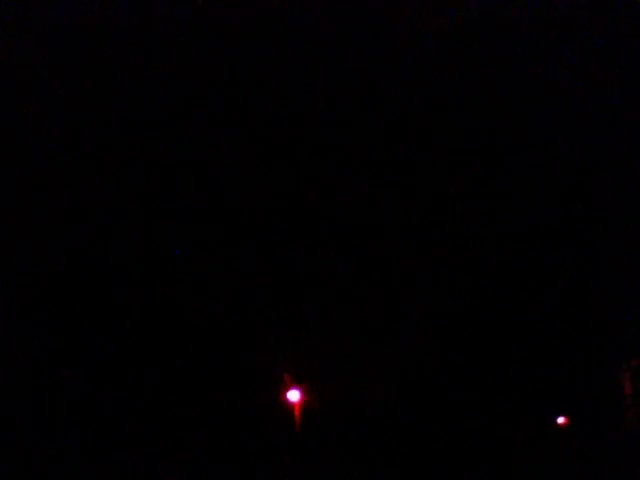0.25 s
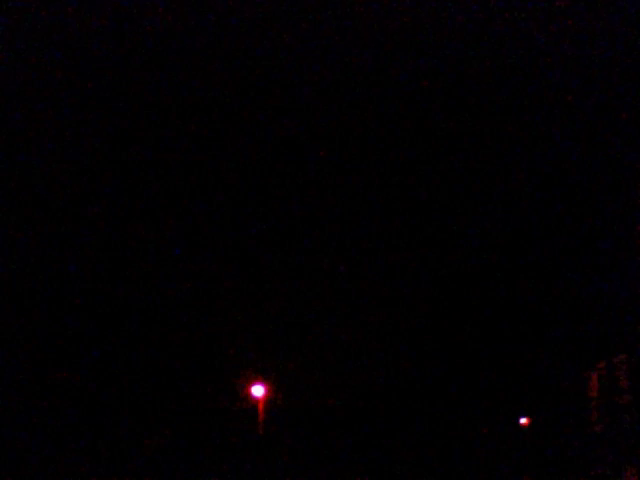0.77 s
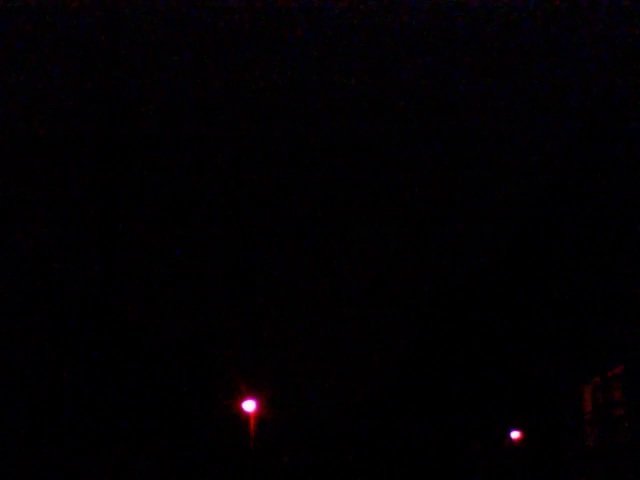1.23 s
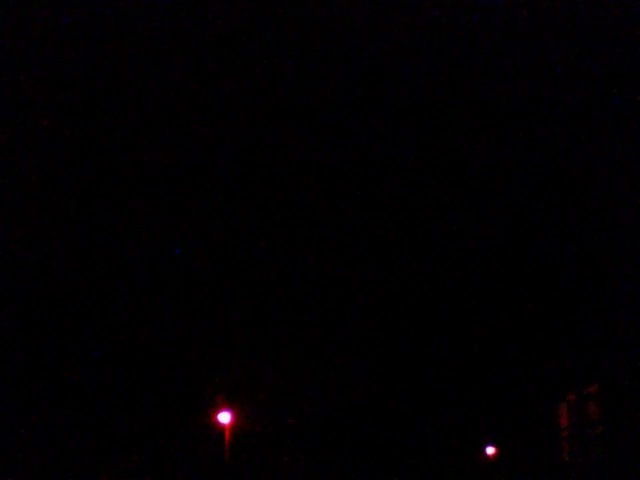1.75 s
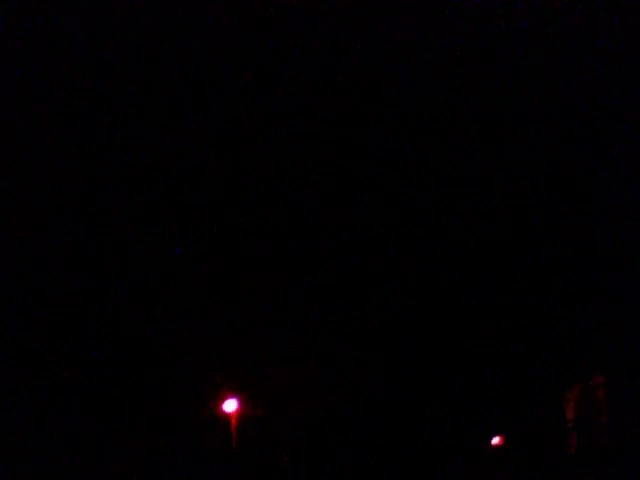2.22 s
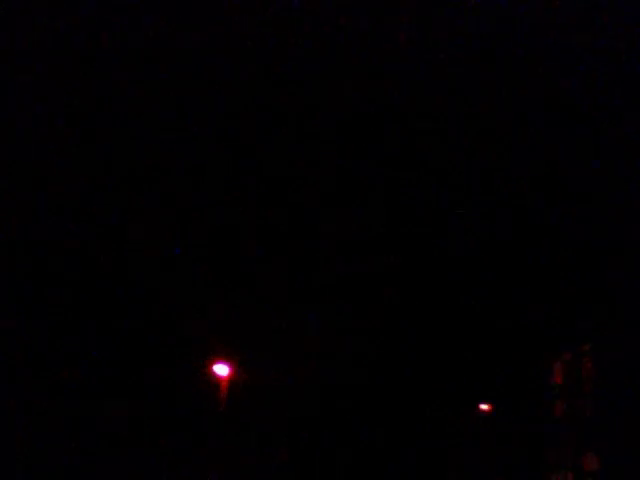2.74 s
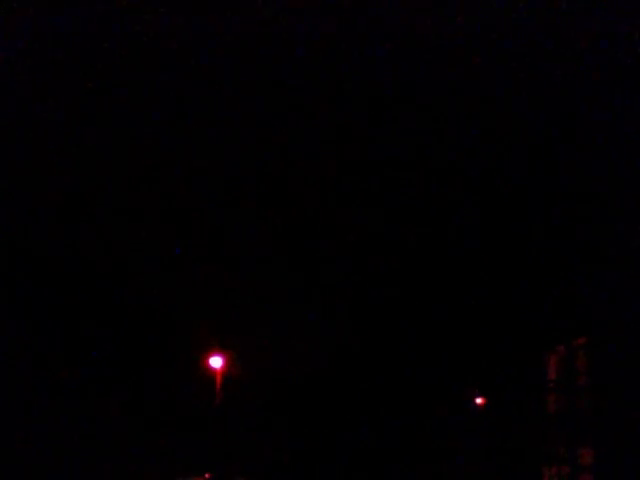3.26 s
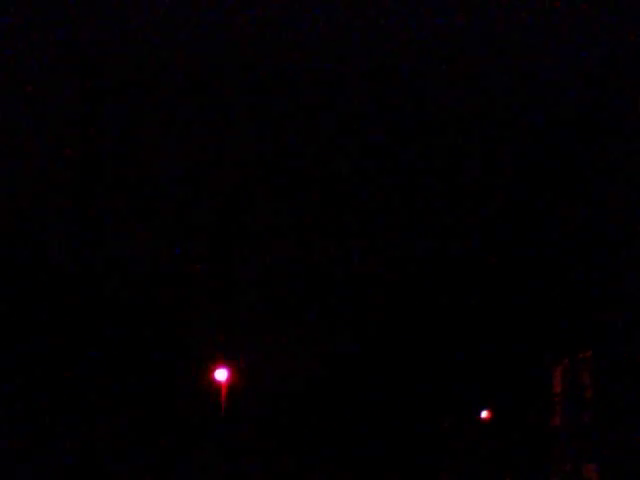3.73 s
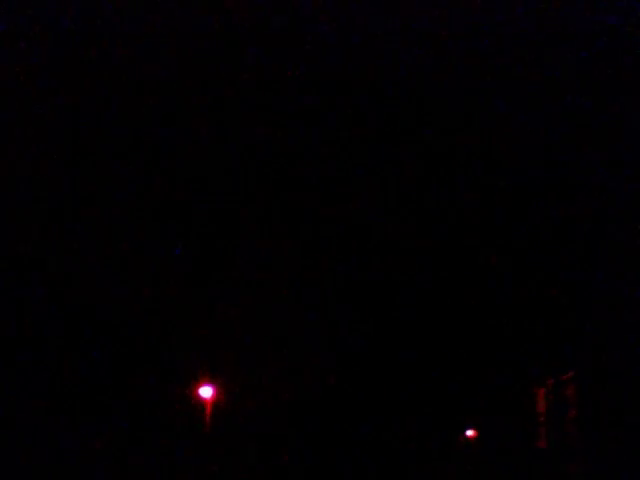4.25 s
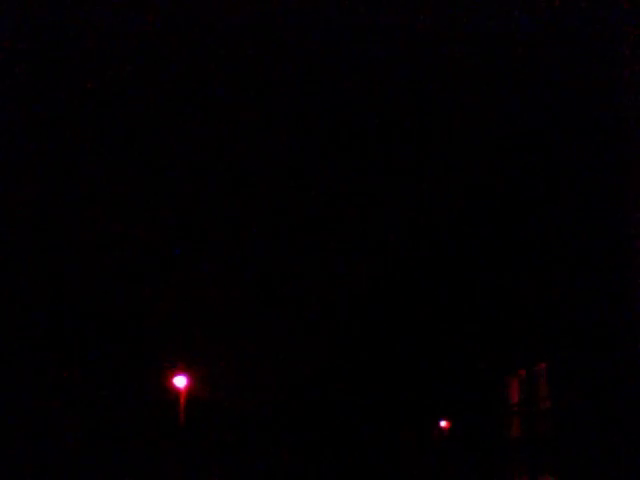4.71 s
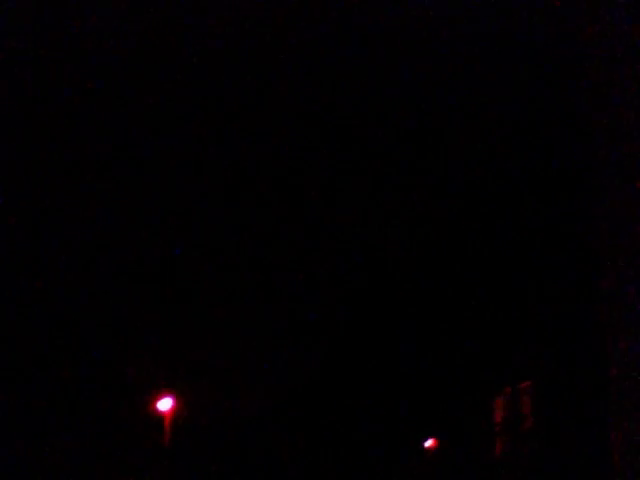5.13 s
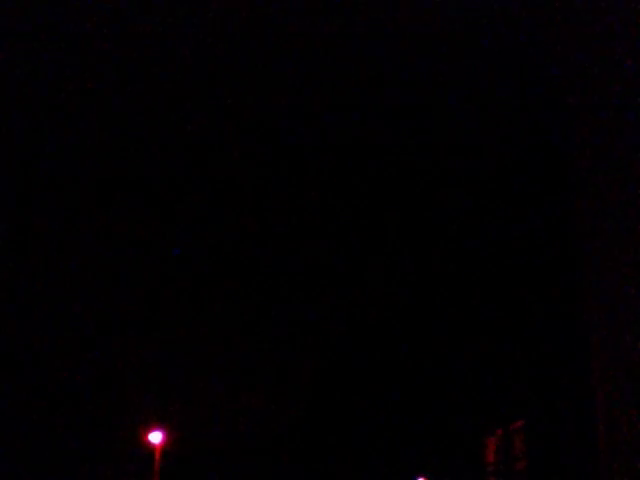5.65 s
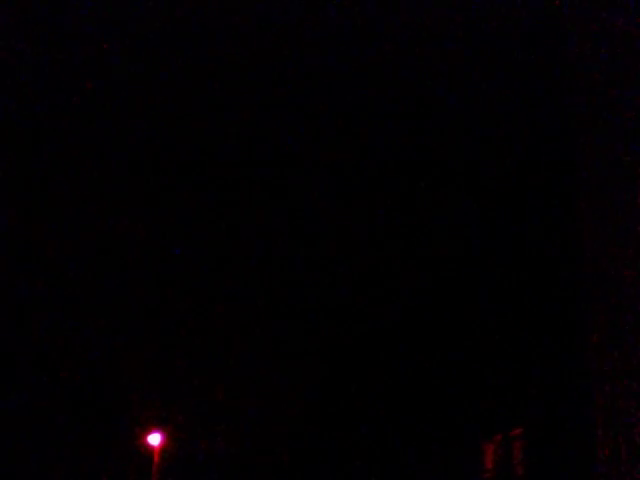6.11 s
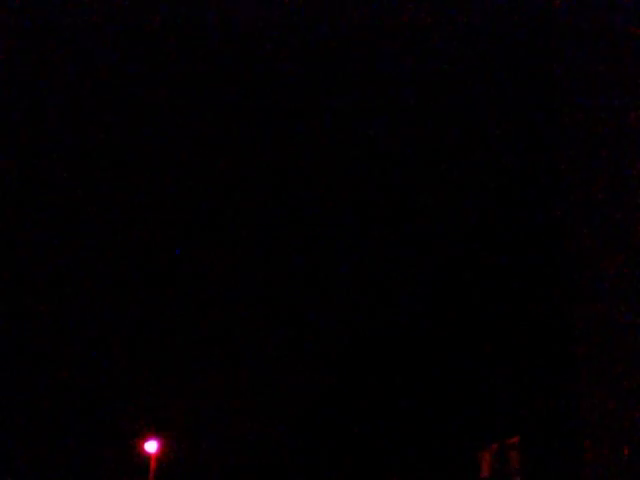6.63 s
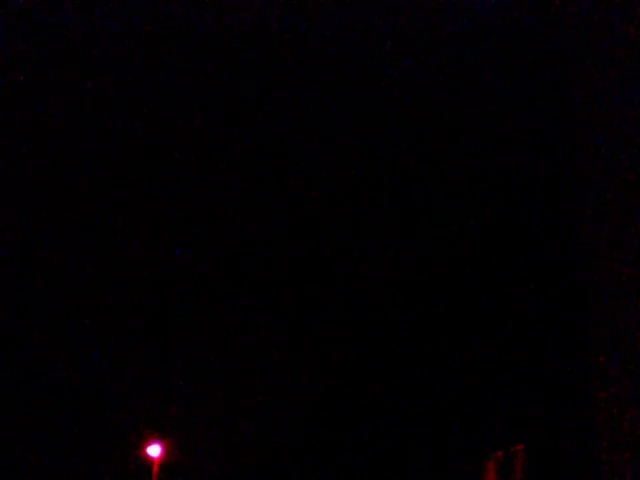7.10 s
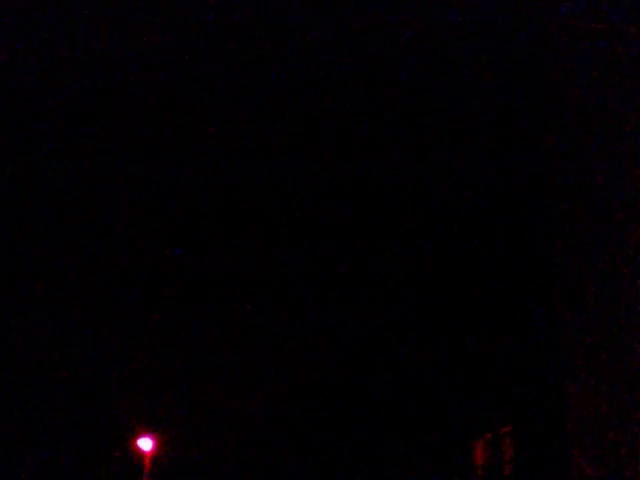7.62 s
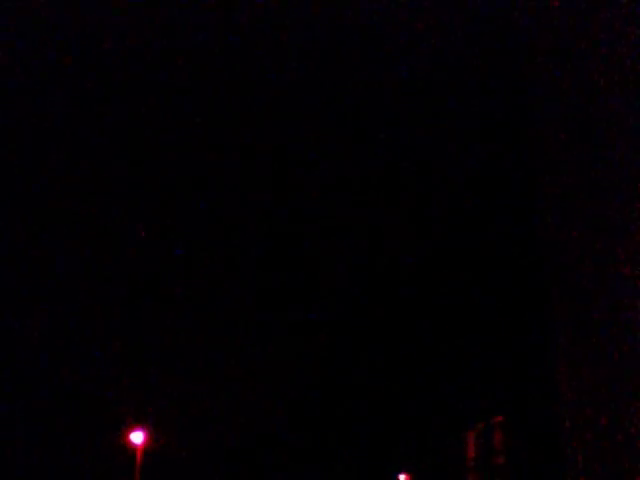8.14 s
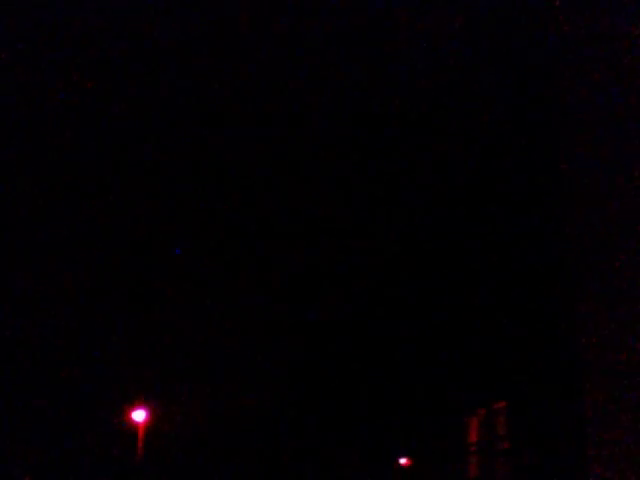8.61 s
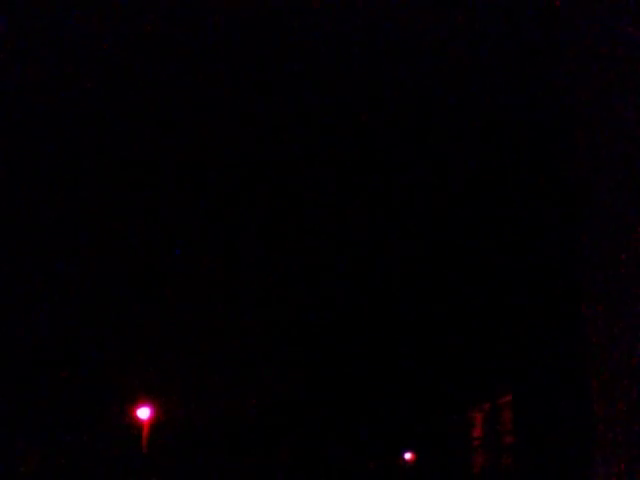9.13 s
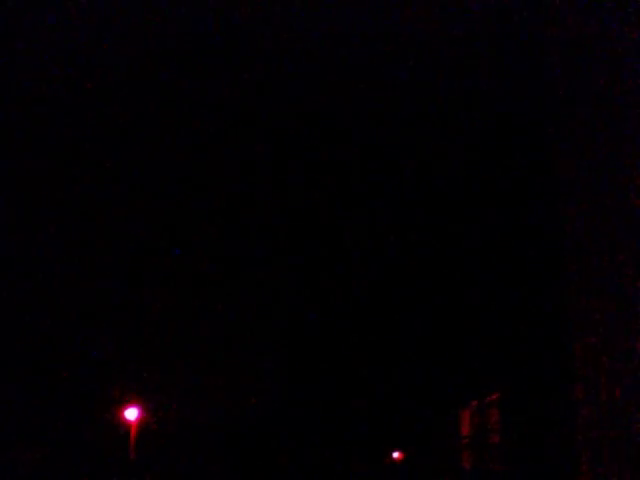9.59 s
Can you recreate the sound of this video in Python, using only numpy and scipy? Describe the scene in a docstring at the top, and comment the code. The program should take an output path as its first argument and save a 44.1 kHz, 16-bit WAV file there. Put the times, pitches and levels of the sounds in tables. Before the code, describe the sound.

Violent tearing thunder cracks above a rainy street, echoes between house fronts, surges again as a deep shudder, and fades into steady rain.

```python
"""A close thunderclap tears open over a street at night, rolls on in peals and sinks back into heavy rain.
The thunder is a swarm of random shock fronts, swelled by rolls and peals, with a pitched boom in each peal.
House fronts add echo and low resonances; sparse impulses make the tearing, shaped noise the deep shudder.
The rain is noise with a patter of impulses, and a few fat drops burst nearby into sprays of droplets.
A small narrow-band microphone overloads on the loudest peals."""
import sys
import numpy as np
from scipy import signal
from scipy.fft import rfft, irfft, next_fast_len
from scipy.io import wavfile
from scipy.ndimage import map_coordinates

SR = 44100
rng = np.random.default_rng(int(sys.argv[2]) if len(sys.argv) > 2 else 0)


def master(y):
    """Save y as 16-bit WAV."""
    cut = np.clip(np.atleast_2d(y).T, -1, 1)
    pcm = np.round(cut * 32767)  # scale
    wavfile.write(sys.argv[1], SR, pcm.astype(np.int16))


N = 434826
ATTACK_S = 0.016  # linear rise in amplitude of each roll and of the shudder


def amp(db):
    """Amplitude ratio: 20 dB is a factor of ten."""
    return 10 ** (np.asarray(db) / 20)


def unit(x):
    """Normalization: x scaled to rms 1."""
    return x / np.sqrt(np.mean(x ** 2) + 1e-20)


def gain(points, hz):
    """Frequency response: gain of (Hz, dB) points joined on a log-frequency axis."""
    f, db = np.transpose(points)
    return amp(np.interp(np.log(hz + 1), np.log(f + 1), db))


def wobble(rate):
    """Slow random modulation: a smooth curve through random knots, rate of them a second."""
    knots = rng.standard_normal(int(N * rate / SR) + 4)
    return map_coordinates(knots, [np.arange(N) * rate / SR])


def filtered(x, response):
    """Linear filtering: the spectrum of x times a response of frequency."""
    m = next_fast_len(N + SR // 2)
    return irfft(rfft(x, m) * response(np.fft.rfftfreq(m, 1 / SR)), m)[:N]


def coloured(x, points, size=8192):
    """Minimum-phase filtering: a causal pulse of energy 1 with the given spectrum, convolved with x."""
    # folding the cepstrum onto positive times makes the pulse causal
    cepstrum = irfft(np.log(gain(points, np.fft.rfftfreq(size, 1 / SR))))
    cepstrum[1:size // 2] *= 2
    cepstrum[size // 2 + 1:] = 0
    pulse = irfft(np.exp(rfft(cepstrum)))
    return signal.fftconvolve(x, pulse / np.linalg.norm(pulse))[:N]


def impacts(rate, spread_db):
    """Shot noise: impulses at random moments, rate a second, with scattered sizes and signs, rms 1."""
    hit = rng.random(N) < rate / SR
    sizes = amp(spread_db * np.clip(rng.standard_normal(N), -2, 2))
    return unit(hit * sizes * rng.choice([-1, 1], N))


def street(x, t60, wet_db):
    """Diffuse reverberation: house fronts scatter a decaying echo; the mean power stays about the same."""
    t = np.arange(SR // 2) / SR
    tail = rng.standard_normal(len(t)) * amp(-60 * t / t60)
    echo = signal.fftconvolve(x, tail / np.linalg.norm(tail))[:N]
    return (x + amp(wet_db) * echo) / np.hypot(1, amp(wet_db))


def walls(x):
    """Resonance: the space between the house fronts reinforces a few low notes."""
    # Each row: resonant frequency in Hz, bandwidth in Hz, strength of the added resonance in dB.
    modes = [(140, 20, -8.5), (220, 39, -8), (366, 36, -6)]

    def response(f):
        resonances = 0
        for hz, width, db in modes:
            damping = 1j * f * width
            resonances = resonances + amp(db) * damping / (hz * hz - f * f + damping)
        return 1 + resonances

    return filtered(x, response)


def rain():
    """Superposition: countless far drops merge into a noise wash; nearer ones patter through it."""
    # Spectrum of the rain. Each row: frequency in Hz, relative spectral level in dB.
    rain_spectrum = [(20, 8.5), (90, 6.5), (150, -6), (400, -14.5), (850, 0), (1150, -3.5), (1400, -8),
                     (1850, -4.5), (2350, -15.5), (2800, -10), (3200, -15), (3700, -15), (4500, -18)]
    wash = rng.standard_normal(N) * amp(-36.0 + 0.92 * wobble(4.5))
    patter = impacts(rate=300, spread_db=5.0) * amp(-41.0)
    return coloured(wash + patter, rain_spectrum)


def splashes():
    """Impact and decay: a fat drop bursts into a short spray of droplets, dense random impulses."""
    # Fat drops landing close by. Each row: start in seconds, relative strength in dB.
    drops = [(1.052, -17), (1.5664, -24), (3.6374, -28.5), (3.81, -21), (4.2293, -28), (5.4115, -28),
             (5.8012, -22), (6.2973, -23.5), (8.339, -22.5), (8.525, -27.5), (8.7485, -27)]
    # Spectrum of the spray. Each row: frequency in Hz, relative spectral level in dB.
    splash_spectrum = [(800, -22), (2000, -15.5), (2900, 2), (3600, -3), (4500, -4.5)]
    decay_60_db_s, rise_s = 0.099, 0.0022
    age = np.arange(SR // 4) / SR
    burst = amp(-60 * age / decay_60_db_s) * (1 - np.exp(-age / rise_s))
    spray = np.zeros(N)
    for start, db in drops:
        spray[round(start * SR):][:len(age)] += amp(db - 3.5) * burst
    droplets = impacts(rate=2500, spread_db=2.5)
    return coloured(spray * droplets, splash_spectrum)


def shudder():
    """Decaying low-frequency noise: the long trunk of the lightning arrives and dies slowly."""
    # Spectrum of the shudder. Each row: frequency in Hz, relative spectral level in dB.
    shudder_spectrum = [(20, -17.5), (45, -5.5), (72, -1.5), (100, -8), (160, -30.5), (400, -71)]
    start_s, level_db, fall_db_per_s = 5.87, -20, 18
    age = np.maximum(np.arange(N) / SR - start_s, 0)
    level = np.minimum(age / ATTACK_S, 1) * amp(level_db - fall_db_per_s * age)
    return coloured(rng.standard_normal(N) * level, shudder_spectrum)


def tearing(roar_power):
    """Modulated shot noise: crackle rides on the roar; the nearest branches, heard first, keep the most."""
    # Spectrum of the crackle. Each row: frequency in Hz, relative spectral level in dB.
    crackle_spectrum = [(500, -39), (1200, -0.5), (1550, 1), (1850, 4), (2100, -1), (2400, -9), (3000, -13),
                        (4200, -33.5)]
    near_db, follow = -25, 0.32  # follow: dB of crackle per dB of roar
    near_end_s, near_fall_db_per_s = 1.72, 19.5
    far_db = -24  # the trace of crackle left in every later roar
    t = np.arange(N) / SR
    roar_db = 10 * np.log10(roar_power)
    near_level_db = near_db + follow * roar_db - near_fall_db_per_s * np.maximum(t - near_end_s, 0)
    far_level = amp(far_db) * np.sqrt(roar_power)
    level = np.hypot(amp(near_level_db), far_level)
    sparks = impacts(rate=360, spread_db=3) * level * amp(1.2 * wobble(35))
    return street(coloured(sparks, crackle_spectrum), t60=0.11, wet_db=-2)


def split(db, bright_db):
    """Partition of power: rumble and roar as a column, with the roar bright_db above the rumble."""
    ratio = amp(bright_db) ** 2
    return amp(db) ** 2 * np.array([[1], [ratio]]) / (1 + ratio)


def rolls():
    """Power envelopes of rumble and roar: each roll rises, holds, drops and leaves a long echo."""
    # Long rolls, one for each branch of the lightning.
    # Each row: start in seconds, hold in seconds, relative strength in dB, roar over rumble in dB.
    branches = [(0.0, 0.11, -26.5, 1), (0.185, 0.25, -11, 2), (0.325, 0.095, -5, 3), (0.5, 0.17, -15.5, 3),
                (0.693, 0.19, -19.5, 1.5), (0.966, 1, -20.5, 2), (2.203, 0.58, -30.5, 0.5),
                (2.487, 0.145, -22.5, -0.5), (2.868, 0.18, -26, 1), (3.559, 0.39, -24, 1),
                (3.984, 0.27, -16.5, 4.5), (4.059, 0.07, -19.5, 7), (4.397, 0.19, -24.5, 2),
                (4.611, 0.13, -20.5, 4.5), (4.984, 0.16, -28.5, 7.5), (5.603, 0.13, -29, -3),
                (5.816, 0.34, -15.5, -3), (5.993, 0.071, -11.5, -1.5), (6.223, 0.11, -17.5, -1.5),
                (6.468, 0.094, -18.5, 1), (6.638, 0.62, -20, -1.5), (6.769, 0.22, -15.5, -4),
                (6.859, 0.067, -15, -1.5), (7.295, 0.18, -16.5, -1.5), (7.552, 0.41, -20.5, -3),
                (7.999, 0.46, -31, -0.5), (8.706, 0.14, -25.5, 3.5), (8.995, 0.86, -27.5, -5.5),
                (9.536, 0.094, -24, -3)]
    fall_db_per_s = 125
    # the long echo, fuller after a long roll
    echo_db, echo_build_s, echo_fall_db_per_s = -16, 0.26, 8.5
    distant_db = -32  # far thunder that never stops
    churn_db, churn_per_s = 0.7, 22  # chance swells
    t = np.arange(N) / SR
    power = np.zeros((2, N))
    for start, hold, db, bright_db in branches:
        first = max(round(start * SR), 0)
        age = t[first:] - start
        past = np.maximum(age - hold, 0)
        drop = amp(-fall_db_per_s * past) ** 2
        echo = amp(echo_db - echo_fall_db_per_s * past) ** 2 * min(hold / echo_build_s, 1)
        rise = np.clip(age / ATTACK_S, 0, 1) ** 2
        power[:, first:] += split(db, bright_db) * rise * (drop + echo)
    churn = amp(churn_db * wobble(churn_per_s)) ** 2
    return (power + split(distant_db, bright_db=-1)) * churn


def swell(centre, db, linger):
    """Gaussian power envelope as a stretch of the channel is heard: its samples and its heights."""
    rise_s, fall_s = 0.0073, 0.0092  # Gaussian half-widths at the middling strength
    middling_db, db_per_doubling = -13.5, 35.5  # stronger peals last longer
    stretch = 2 ** ((db - middling_db) / db_per_doubling)
    rise, fall = np.array([rise_s, fall_s * linger]) * stretch
    limits = np.array([centre - 5 * rise, centre + 5 * fall]) * SR
    on = np.arange(*np.clip(limits, 0, N).astype(int))
    age = on / SR - centre
    return on, np.exp(-.5 * (age / np.where(age < 0, rise, fall)) ** 2)


def peals():
    """Periodicity pitch: fronts spaced nearly evenly sound a boom; also the rumble and roar power of the peals."""
    # The sharpest peals, one for each big bend of the lightning channel.
    # Each row: centre in seconds, relative strength in dB, mean boom pitch in Hz, roar over rumble in dB.
    bends = [(0.045, -20, 900, 4), (0.213, -5.5, 270, 8), (0.257, -8, 494, 3), (0.294, -3, 429, 2.5),
             (0.348, 6, 335, -6), (0.41, 0.5, 350, 3), (0.517, -3.5, 540, 2), (0.577, -5, 378, 5),
             (0.621, -14, 910, 7), (0.703, -8, 208.7, -11), (0.777, -8.5, 206.3, 6),
             (0.836, -9.5, 179.4, 3.5), (0.887, -14, 147, 3.5), (1.034, -15.5, 660, 12),
             (1.178, -15.5, 351, 8.5), (1.263, -14, 177.2, 0.5), (1.298, -9.5, 194.5, 6.5),
             (1.351, -6.5, 685, 1.5), (1.447, -14.5, 432, -4), (1.476, -18.5, 682, 0.5),
             (1.553, -12, 436, -4), (1.66, -14, 406.3, 5), (1.703, -13.5, 242.2, -8),
             (1.739, -11, 227.7, -1.5), (1.841, -13.5, 244, -6.5), (1.901, -14.5, 215, -2.5),
             (2.168, -23.5, 525, 10), (2.502, -11, 235.7, -0.5), (2.571, -10.5, 483, 1.5),
             (2.909, -16, 382, 5), (3.012, -11, 355, -2), (3.487, -18.5, 350, -1.5), (3.681, -16, 573, 5),
             (3.78, -19, 721, 8), (3.861, -18, 869, 1), (3.914, -18.5, 343, 1), (4.033, -12.5, 355, 2.5),
             (4.093, -11.5, 720, 6), (4.166, -15, 513, 5), (4.583, -15.5, 361.7, 3),
             (4.662, -17.5, 530, 4.5), (4.752, -16.5, 533, 5), (5.018, -23, 360, 7),
             (5.829, -9.5, 243.4, -4), (5.974, -8.5, 368, -9.5), (6.043, -6.5, 365.8, -3.5),
             (6.092, -9, 366, -4), (6.442, -11.5, 262, -2.5), (6.511, -14, 362, 0), (6.793, -17, 161, -9.5),
             (6.905, -11.5, 140, -5), (7.0, -14, 185.3, -8.5), (7.186, -10, 150, -7),
             (7.324, -11, 450, -2.5), (7.358, -14, 145, -5), (7.737, -14, 318, -9),
             (7.951, -11.5, 250.7, -15), (8.192, -21.5, 317, -7), (8.414, -20, 220, -10),
             (8.773, -20.5, 535, -12), (9.057, -18, 229.6, -5), (9.151, -20.5, 185, -18),
             (9.563, -16, 366, -17)]
    boom_share, boom_linger = .42, 1.46  # part of the peal's power; stretch of the fall
    power, booms = np.zeros((2, N)), np.zeros(N)
    stagger = 0.92 * wobble(110)  # phase in radians: the fronts come only roughly evenly spaced
    phases = rng.uniform(0, 2 * np.pi, len(bends))
    for (centre, db, hz, bright_db), phase in zip(bends, phases):
        on, bell = swell(centre, db, linger=1)
        power[:, on] += (1 - boom_share) * split(db, bright_db) * bell
        # the mean spacing of the fronts sets the pitch of the boom
        on, bell = swell(centre, db, boom_linger)
        level = amp(db) * np.sqrt(2 * boom_share * bell / boom_linger)
        booms[on] += level * np.sin(2 * np.pi * hz * on / SR + phase + stagger[on])
    return power, booms


def thunder(rumble_power, roar_power, booms):
    """Superposed shock fronts: far ones make the rumble, near ones the roar, and the houses echo them."""
    # Spectra of far and near fronts. Each row: frequency in Hz, relative spectral level in dB.
    rumble_spectrum = [(15, -19.5), (35, -11), (72, -9.5), (100, -8.5), (138, 0), (185, -3.5), (240, -0.5),
                       (350, -3), (440, -8.5), (700, -38.5), (1500, -71)]
    roar_spectrum = [(120, -32), (300, -15.5), (400, -4), (490, 1), (600, -0.5), (820, -1.5), (1000, -6.5),
                     (1190, -7), (1380, -18.5), (1850, -21), (2400, -40.5), (4200, -53.5)]
    far_fronts = impacts(rate=2500, spread_db=1.5)
    near_fronts = impacts(rate=3500, spread_db=2)
    rumble = amp(-0.32) * coloured(far_fronts * np.sqrt(rumble_power), rumble_spectrum)
    roar = amp(0.16) * coloured(near_fronts * np.sqrt(roar_power), roar_spectrum)
    resonant = walls(amp(-1) * (rumble + roar))
    return street(resonant + amp(-.6) * booms, t60=.2, wet_db=-15)


def scene():
    """Linear superposition of thunder and rain, mono."""
    peal_power, booms = peals()
    rumble_power, roar_power = rolls() + peal_power
    storm = thunder(rumble_power, roar_power, booms) + shudder() + tearing(roar_power)
    return (storm + rain() + splashes())[None]


def record(dry):
    """Nonlinear distortion: the capsule squashes pushes and stretches pulls; the converter clips the pulls."""
    # Treble roll-off ahead of the converter. Each row: frequency in Hz, gain in dB.
    voice_band = [(3750, 0), (4000, -4), (4250, -14), (4450, -32), (4700, -75)]
    # Treble response after the converter. Each row: frequency in Hz, gain in dB.
    air_band = [(4000, 0), (4800, -10), (6500, -6), (8000, -1), (10000, -8), (15000, -9)]
    top_hz = 15850  # nothing passes from here up
    headroom, deepest_pull, hardest_push = .75, .62, .5
    pressure = np.clip(dry[0], -deepest_pull, hardest_push)
    capsule = headroom * (1 - np.exp(-pressure / headroom))
    narrow = filtered(capsule, lambda hz: gain(voice_band, hz))
    offset, rail = -.1085, -.71  # the converter sits off centre
    floor = rail - offset
    # the slow drift of the lopsided wave, below about 10 Hz, is taken out before clipping
    drift = filtered(np.maximum(narrow, floor), lambda hz: 1 / (1 + 1j * hz / 10))
    clipped = np.maximum(narrow - drift, floor)
    return offset + filtered(clipped, lambda hz: gain(air_band, hz) * (hz < top_hz))[None]


dry = scene()
out = record(dry)
master(out)
```